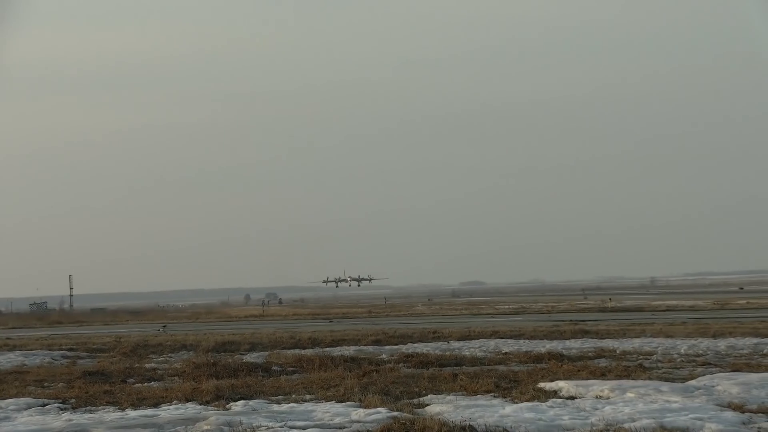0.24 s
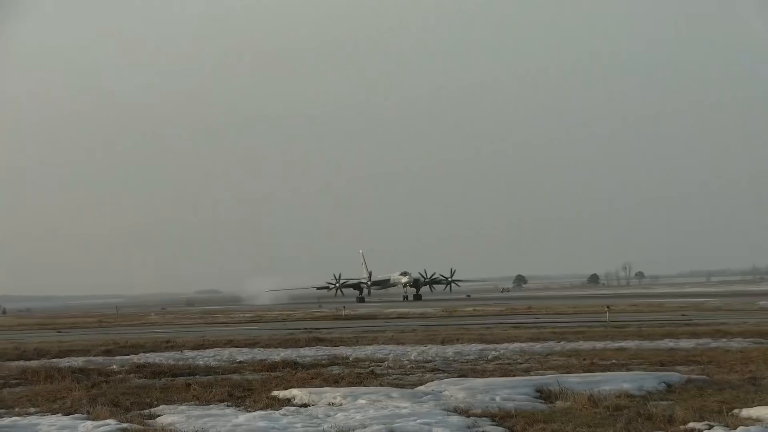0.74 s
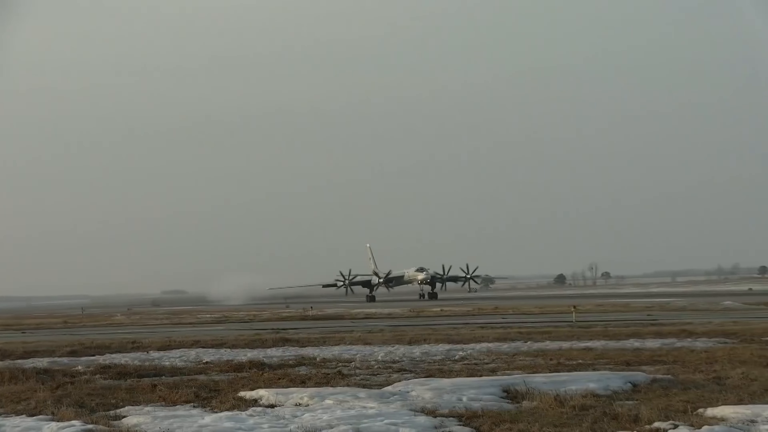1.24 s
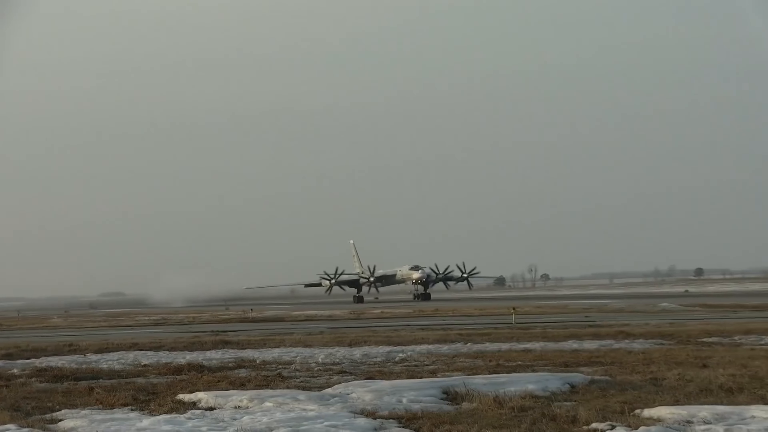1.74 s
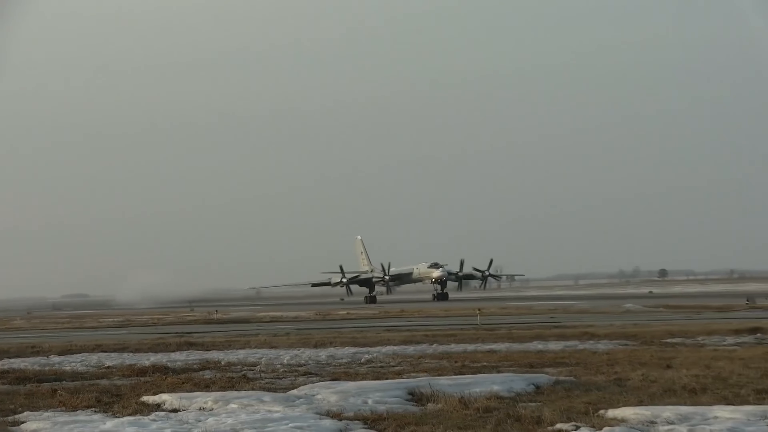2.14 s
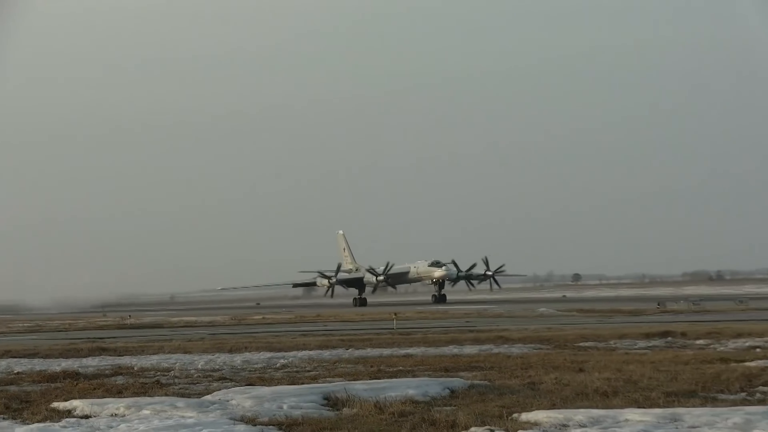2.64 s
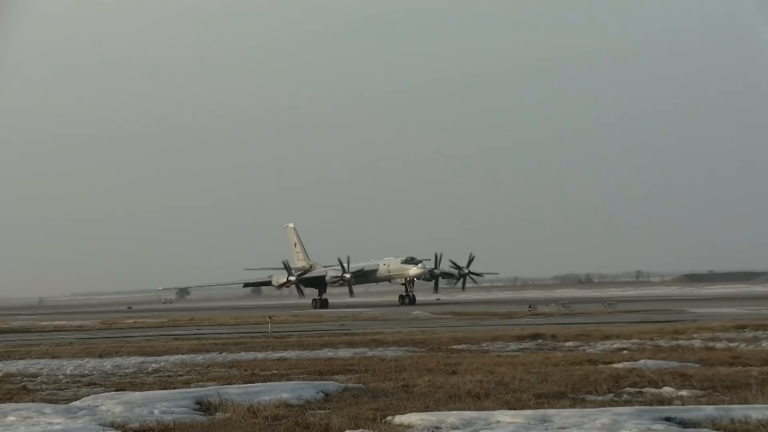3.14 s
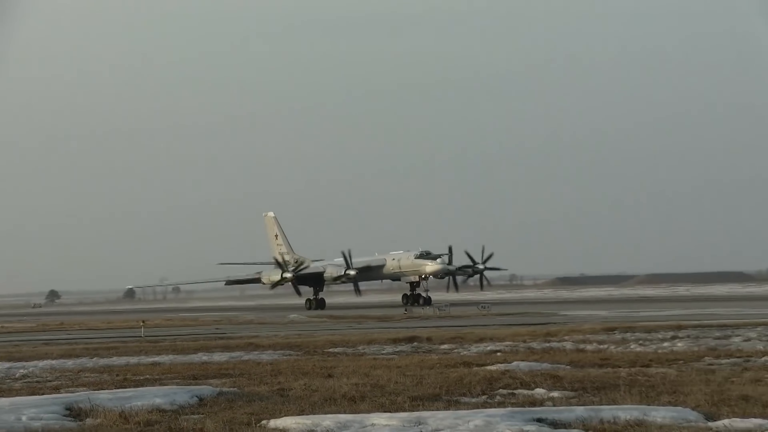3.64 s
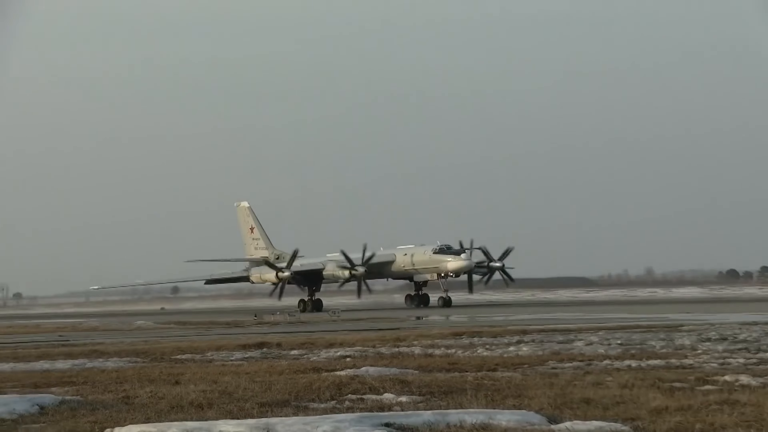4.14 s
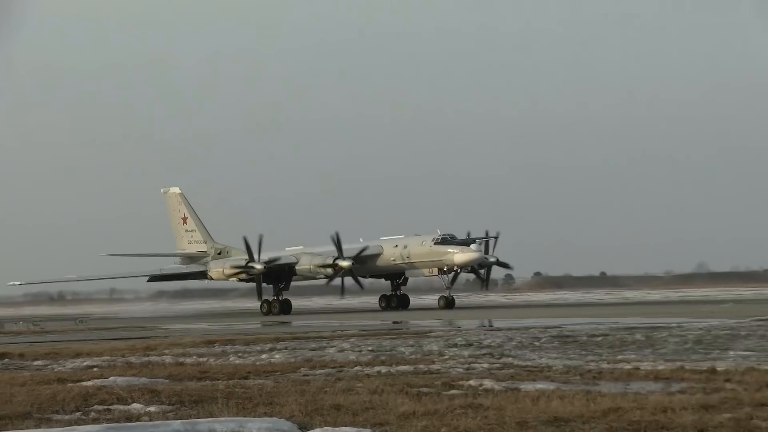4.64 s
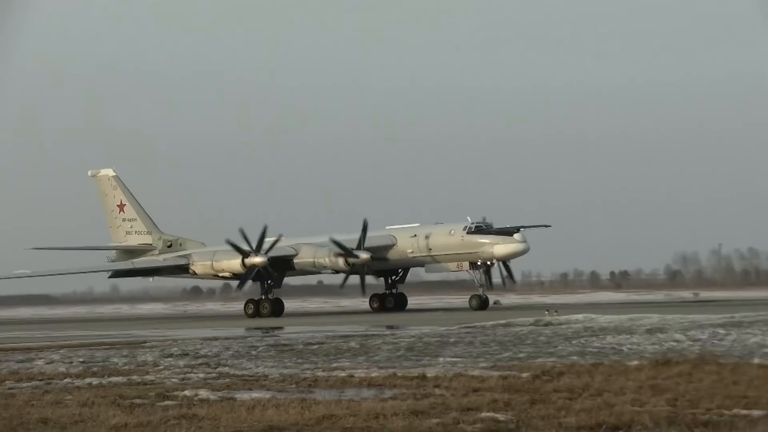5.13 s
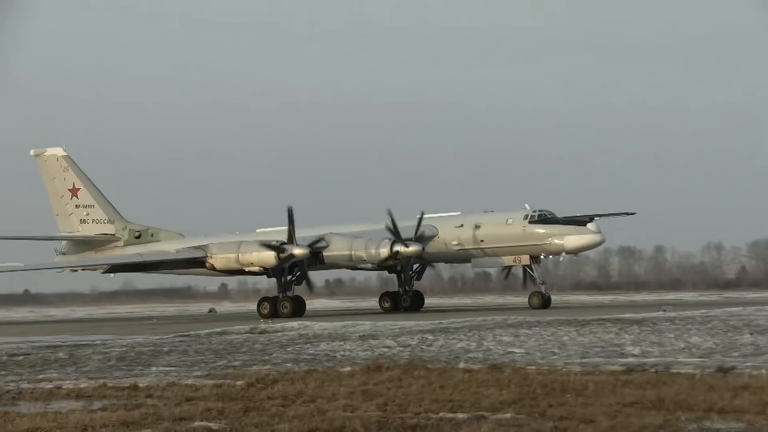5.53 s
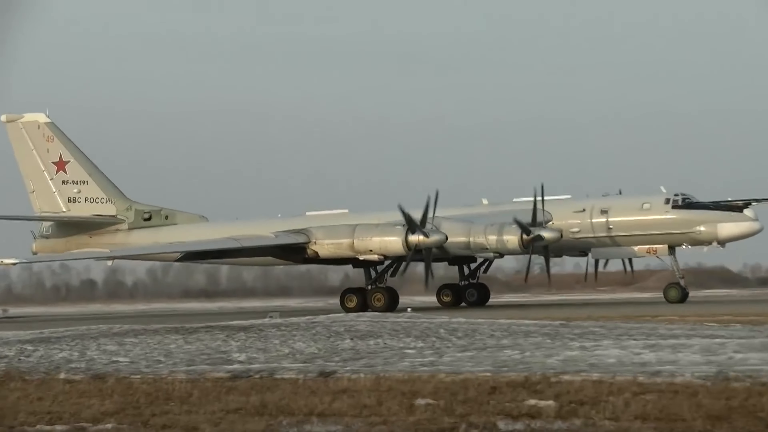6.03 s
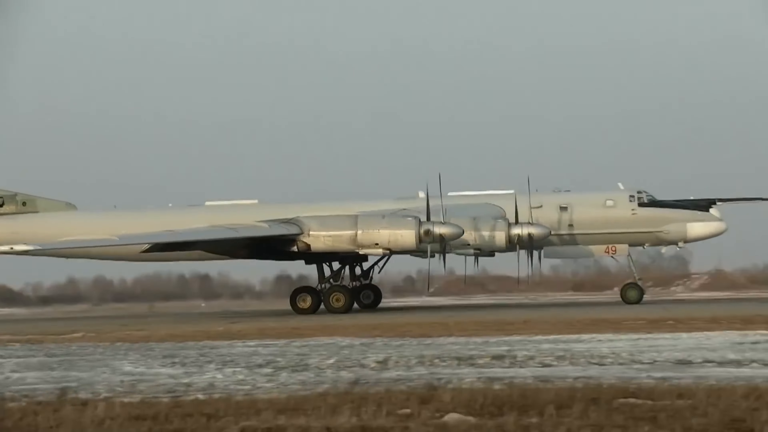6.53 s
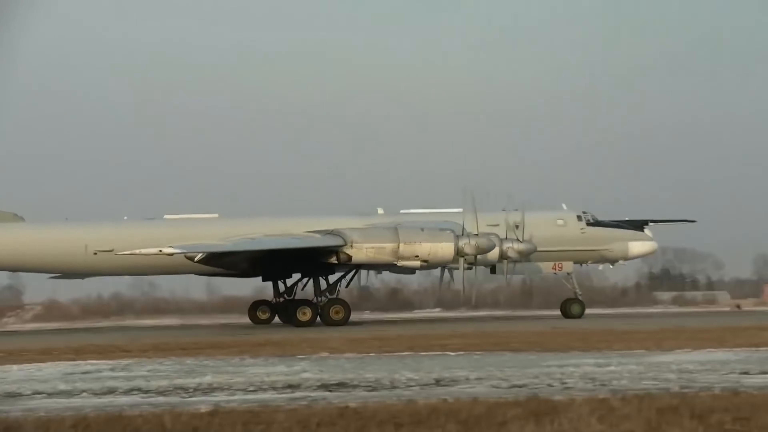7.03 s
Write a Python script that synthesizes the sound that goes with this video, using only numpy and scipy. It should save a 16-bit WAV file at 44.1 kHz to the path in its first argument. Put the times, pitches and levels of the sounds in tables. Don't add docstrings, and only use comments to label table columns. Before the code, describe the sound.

Distant propeller hum jumps nearer, then a heavy aircraft's throbbing drone and rushing roar build, brighten and slide lower while rolling by.

```python
import sys
import numpy as np
from scipy import signal
from scipy.fft import rfft, irfft, next_fast_len
from scipy.io import wavfile
from scipy.ndimage import uniform_filter1d

SR = 44100
rng = np.random.default_rng(int(sys.argv[2]) if len(sys.argv) > 2 else 0)


def transcribe(signal):
    frames = np.atleast_2d(signal).T
    limited = np.clip(frames, -1, 1)
    pcm = np.round(limited * 32767).astype(np.int16)
    wavfile.write(sys.argv[1], SR, pcm)


def rack_gain(trim_db):
    fader = np.asarray(trim_db, float)
    return 10 ** (fader / 20)


N = 321048
CHANGE_S = 0.7235


def in_time(rows, t):
    s, *columns = np.transpose(rows)
    return np.array([np.interp(t, s, column) for column in columns])


def at_hz(points, hz):
    points_hz, points_db = np.transpose(points)
    return np.interp(np.log(hz + 1), np.log(points_hz), points_db)


def drift(rate_hz, count):
    pole = np.exp(-80 * np.pi * rate_hz / SR)
    chance = rng.standard_normal((count, N // 40 + 2002))
    slow = signal.lfilter([1], [1, -2 * pole, pole * pole], chance)[:, 2000:]
    slow = slow / slow.std(axis=1, keepdims=True)
    return np.repeat(slow, 40, axis=1)[:, :N]


def smooth_drift(rate_hz, count):
    return uniform_filter1d(drift(rate_hz, count), size=80)


def abeam(blade_hz):
    head_on_hz, abeam_hz = 63, 44
    return np.clip((head_on_hz - blade_hz) / (head_on_hz - abeam_hz), 0, 1)


# t/s, level/dB rms, order favoured by the bearing, upper orders' level/dB
DRONE = [(0.724, -54.9, 3.31, -59.5), (1.3, -51.5, 3.71, -61), (2.0, -51.6, 3.75, -63.5),
         (2.7, -49.5, 4.21, -58), (3.4, -43, 3.98, -57), (4.0, -42.5, 5.71, -50), (4.4, -36.5, 6.18, -41),
         (4.8, -32, 6.12, -34.5), (5.2, -35.5, 5.96, -37.5), (5.6, -37, 5.71, -44.5),
         (6.0, -38.5, 5.69, -44), (6.4, -43.5, 4.61, -50), (6.8, -48.5, 4.84, -45),
         (7.28, -51.5, 5.16, -63)]
ORDERS_DB = [1.5, 15.5, 2.8, -0.44, -5.5, -4.5, -2, -5]
OPENING_ORDERS_DB = [-82, -64, -91, -63.5, -88, -72.5, -80, -76.5]
# t/s, order, length/s, gain/dB
SWELLS = [(1.39, 5, 0.17, 8.8), (1.48, 4, 0.52, 7.5), (1.55, 6, 0.1702, 8.5), (2.14, 5, 0.25, 13.5),
          (2.31, 4, 0.16, 7.5), (2.85, 4, 0.22, 8.5), (2.99, 5, 0.32, 11), (3.05, 6, 0.15, 8.2),
          (3.2, 2, 0.094, 3), (3.48, 5, 0.14, 9.5), (3.92, 5, 0.21, 7.5), (4.55, 6, 0.16, 7),
          (4.66, 5, 0.5, 14), (5.05, 3, 0.22, 12.5), (5.19, 6, 0.36, 4), (5.4, 4, 0.098, 24),
          (5.41, 5, 0.21, 7), (5.62, 3, 0.28, 11), (6.05, 1, 0.44, 22), (6.07, 3, 0.055, 10),
          (6.33, 3, 0.094, 9.5), (6.5, 2, 0.1, 1.5), (6.5, 7, 0.08, 7), (6.54, 3, 0.045, 10),
          (6.79, 7, 0.18, 3), (6.85, 4, 0.07, 11.6), (6.88, 3, 0.071, 13), (7.0, 8, 0.1, 10),
          (7.03, 2, 0.081, 9), (7.2, 1, 0.31, 19)]
# t/s, order, length/s, gain/dB
NULLS = [(0.745, 4, 0.1, -9.5), (0.9, 3, 0.34, -26), (1.72, 3, 0.36, -24.0), (1.75, 2, 0.27, -12.1),
         (2.445, 5, 0.1, -12), (2.58, 4, 0.056, -17), (2.672, 6, 0.37, -5.6), (3.132, 3, 0.24, -7),
         (3.237, 4, 0.046, -7), (3.69, 7, 0.054, -10.1), (3.78, 6, 0.087, -24.0), (3.93, 3, 0.15, -22),
         (3.98, 4, 0.23, -14), (4.245, 8, 0.18, -12), (4.705, 7, 0.094, -26), (5.121, 7, 0.098, -24),
         (5.17, 8, 0.24, -14), (5.35, 3, 0.065, -8), (5.442, 4, 0.36, -18.5), (5.79, 5, 0.06, -17),
         (5.874, 7, 0.13, -28), (5.95, 3, 0.037, -18), (6.29, 2, 0.11, -24.0), (6.47, 5, 0.049, -17),
         (6.783, 2, 0.051, -4)]
# t/s, order, length/s, gain/dB
LATE_NULL = (6, 2.5, 0.2, -10)


def order_levels(t, blade_hz):
    level_db, favoured, upper_db = in_time(DRONE, t)
    order = np.arange(1, 9)[:, None]
    octaves_off = np.log2(order / np.maximum(favoured, 1))
    db = np.array(ORDERS_DB)[:, None] + level_db - 10.5 * octaves_off ** 2
    db[0] = -71
    for s, k, length_s, beat_db in [*SWELLS, *NULLS, LATE_NULL]:
        db[round(k) - 1] += beat_db * np.exp(-((t - s) / length_s) ** 2)
    db = np.where(t < CHANGE_S, np.array(OPENING_ORDERS_DB)[:, None], db)
    head_on_beat_db, abeam_beat_db = 0.5, 4.5
    beat_depth_db = head_on_beat_db + (abeam_beat_db - head_on_beat_db) * abeam(blade_hz)
    db += beat_depth_db * np.minimum(smooth_drift(3.89, count=8), 1)
    opening_upper_db = -72
    return db, np.where(t < CHANGE_S, opening_upper_db, upper_db + 4)


def low_orders(orders_db, turn, shake, apart):
    flutter_db, wander_rad = 1.24, 0.95
    tones = np.zeros(N)
    for k, db in enumerate(orders_db):
        phase = (k + 1) * turn + wander_rad * apart[k] + np.pi - 2.7 / (k + 1)
        tones += np.sqrt(2) * rack_gain(db + flutter_db * shake[k]) * np.cos(phase)
    return tones


# multiple of the blade rate, level/dB
UPPER = [(9, -14), (10, -8.5), (11, -7), (12, -6.5), (13, -6), (14, -10), (15, -12), (16, -11), (18, -24),
         (19, -45), (20, -23), (21, -36), (23, -24)]


def upper_orders(upper_db, turn, blade_hz):
    near_engine, far_engines, detune = 1.55, 0.55, 0.00197
    slip = detune * np.cumsum(drift(0.5936, count=3) * blade_hz, axis=1) * 2 * np.pi / SR
    start = rng.uniform(0, 2 * np.pi, (len(UPPER), 3, 1))
    tones = np.zeros(N)
    for (order, db), start_rad in zip(UPPER, start):
        engines = np.sin(round(order) * (turn + slip) + start_rad)
        tones += rack_gain(upper_db + db - 4.0) * np.dot([near_engine, far_engines, far_engines], engines)
    return tones


def blade_row_tone(engine_db, blade_hz, turn, shake, apart):
    order, base_db, fade_db, flutter_db = 2.47, -5, 42, 5.0
    db = engine_db + base_db - fade_db * abeam(blade_hz) + flutter_db * np.minimum(shake, 1)
    return rack_gain(db) * np.sin(order * turn + 2 * apart)


# t/s, Doppler-shifted blade rate f/Hz, air path/m, engine level/dB after gain control
PASS = [(0.0, 64.26, 780, -66.5), (0.72, 65.3, 580, -64.5), (0.724, 63.23, 840, -55),
        (1.13, 63.1, 760, -53), (1.8, 63.1, 623, -50), (2.46, 62.56, 413, -47), (3.04, 62.27, 295, -44.5),
        (3.55, 61.58, 240, -42), (3.88, 61.15, 220, -38.5), (4.21, 60.26, 160, -36),
        (4.65, 58.72, 107, -34), (5.07, 57.15, 135, -29.5), (5.45, 56.3, 104.0, -28.5),
        (5.8, 54.32, 86, -26.5), (6.17, 52.53, 110, -26.5), (6.5, 49.87, 93.5, -26.5),
        (6.85, 46.68, 86, -27.5), (7.28, 44.3, 95, -27)]


def propellers():
    t = np.arange(N) / SR
    blade_hz, _, engine_db = in_time(PASS, t)
    orders_db, upper_db = order_levels(t, blade_hz)
    turn = 2 * np.pi * np.cumsum(blade_hz) / SR
    shake = smooth_drift(29.0, count=8)
    apart = smooth_drift(0.5, count=8) * np.linspace(0.5, 2, N)
    tones = low_orders(orders_db, turn, shake, apart) + upper_orders(upper_db, turn, blade_hz)
    return tones + blade_row_tone(engine_db, blade_hz, turn, shake[0], apart[0]), turn


# level/dB, air loss/(dB per km), gain abeam/dB
NOISE = [
    (3.26, -7.4, -22.5),
    (-11, -3.5, -0.5),
    (1.38, 0.2, -1.64),
    (-6, 13.5, -0.5),
    (-10, 59, 15.4),
    (-21, 114, 15.5),
]


def band_levels(t):
    blade_hz, path_m, level_db = in_time(PASS, t)
    base_db, loss_db_per_km, beam_db = np.transpose(NOISE)[:, :, None]
    levels = level_db + base_db - loss_db_per_km * path_m / 1000 + beam_db * abeam(blade_hz)
    wash_peak_db = np.array([[1.5], [6]])
    levels[:2] += wash_peak_db * np.exp(-((t - 4.93) / 0.47) ** 2)
    levels[3:] += 3.5 * np.exp(-((t - 5.3) / 0.16) ** 2)
    shimmer_db = 0.28
    levels[3:] += shimmer_db * drift(5.0, count=3)[:, np.minimum(t * SR, N - 1).astype(int)]
    return levels


def bump(rows, below_hz, above_hz, hz, t):
    centre_hz, db = in_time(rows, t)
    away = hz[:, None] - centre_hz
    width_hz = np.where(away < 0, below_hz, above_hz)
    return db * (t > CHANGE_S) * np.exp(-(away / width_hz) ** 2)


# f/Hz, width/Hz, left level/dB, right level/dB
PORTS = [(930, 250, -4.4, -5.7), (1850, 950, 7, 2.4), (2240, 300, -6.5, -7.5), (2530, 420, 6, 6.5),
         (3380, 350, 3, .8), (4450, 420, 1, -7), (4750, 420, -5, -4.5), (5650, 600, -2.5, 1),
         (6230, 390, 5.3, 5), (6870, 550, -7.9, -1.7), (7100, 320, .2, -7), (7390, 420, -7.5, 7.5),
         (7840, 270, 6, -9.2), (8260, 150, 2, 2.3), (8800, 300, -3.5, 1), (11000, 700, -7, 3)]


def port(side):
    sections = []
    for hz, width_hz, *db in PORTS:
        a = rack_gain(db[side] / 2)
        q = np.tan(np.pi * width_hz / SR)
        c = -2 * np.cos(2 * np.pi * hz / SR)
        section = np.array([1 + q * a, c, 1 - q * a, 1 + q / a, c, 1 - q / a])
        sections.append(section / (1 + q / a))
    return np.array(sections)


# low f/Hz, high f/Hz
BANDS_HZ = [
    (90, 450),
    (500, 1000),
    (1200, 2900),
    (3200, 3900),
    (5700, 6700),
    (7800, 10000),
]
# f/Hz, level/(dB per Hz)
COLOUR = [(40, -24), (90, -8), (200, 1), (450, 4.5), (900, 9.5), (1500, -1.5), (3600, -2.5), (4100, -7),
          (5300, -3), (6600, -6.5), (7100, -20), (10200, -36), (10800, -47), (16000, -55)]
# f/Hz, level/dB
OPENING_COLOUR = [(400, -2.5), (600, 6), (900, 4.5), (1150, 4), (1420, -9), (1750, -2.5), (2250, 6.5), (2600, -6),
                  (3300, 4.5), (3800, -1)]
# t/s, centre f/Hz, level above the roar/dB
WHINE = [(0.72, 4550, 16), (2.5, 4517, 12.5), (4.0, 4516, 12), (4.45, 4268, 6.5), (4.54, 4317, 14.5),
         (4.62, 4100, 7.5), (5.2, 4199, 6.5), (6.3, 3560, 1.5), (7.28, 3498, 2)]
# t/s, centre f/Hz, level/dB
LOW_NULL = [(0.72, 1140, 0), (3.3, 1100, -0.5), (3.8, 1220, -5.5), (4.5, 1180, -5.5), (5.3, 1070, -4.5),
            (6.2, 927.5, -6), (7.28, 750, -8.5)]
# t/s, centre f/Hz, level/dB
RIDGE = [(5.3, 2300, 0.1), (5.7, 2250, 2.9), (6.1, 2040, 3.7), (6.5, 1819, 2.37), (7.28, 1600, 1.9)]
# t/s, centre f/Hz, level/dB
LOW_BAND = [(0.72, 480, -3), (3.8, 584, -5.5), (4.5, 600, -.5), (5.6, 480, .5), (6.6, 460, 3.5),
            (7.28, 440, 2)]
# t/s, centre f/Hz, level/dB
GROUND = [(0.72, 3100, -7), (2.2, 3100, -8), (3.5, 2970, -8), (4.35, 2850, -7), (4.5, 2850, -1.5),
          (4.55, 3420, -1.5), (4.7, 3330, -8), (5.1, 3130, -10), (5.5, 3010, -9), (6.3, 3060, -6),
          (7.28, 3040, -10)]


def air_noise():
    hz, t, cells = signal.stft(rng.standard_normal(N), SR, nperseg=512)
    ports = sum(signal.sosfreqz(port(side), hz, fs=SR)[1] for side in range(2)) / 2
    heard = np.abs(ports) * rack_gain(at_hz(COLOUR, hz))
    have = [np.sqrt(np.sum(heard[(hz > low) & (hz < high)] ** 2) / len(hz)) for low, high in BANDS_HZ]
    need_db = band_levels(t) - 20 * np.log10(have)[:, None]
    centres = np.log([np.sqrt(low * high) for low, high in BANDS_HZ])
    blend = np.array([np.interp(np.log(hz + 1), centres, row) for row in np.eye(len(centres))])
    eddies = uniform_filter1d(rng.standard_normal(cells.shape), size=9)
    eddies = uniform_filter1d(eddies, size=7, axis=0)
    eddies = eddies / eddies.std()
    patchy_db = 0.62
    gain_db = blend.T @ need_db + at_hz(COLOUR, hz)[:, None] + patchy_db * eddies
    gain_db += bump(WHINE, 280, 590, hz, t) * (1 + 0.082 * eddies[len(hz) // 5])
    gain_db += bump(LOW_NULL, 190, 200, hz, t)
    gain_db += bump(RIDGE, 110, 150, hz, t)
    gain_db += bump(LOW_BAND, 110, 110, hz, t)
    gain_db += bump(GROUND, 130, 130, hz, t)
    gain_db += np.outer(at_hz(OPENING_COLOUR, hz), t < CHANGE_S)
    return signal.istft(cells * rack_gain(gain_db), SR, nperseg=512)[1][:N]


# f/Hz, level/dB rms
HUM = [(750.5, -63.5), (1126, -79), (1502, -83), (1877, -82)]


def faint_hum(t):
    hum = np.zeros(N)
    for (hz, db), waver in zip(HUM, smooth_drift(7.0, count=len(HUM))):
        hum += np.sqrt(2) * rack_gain(db + 0.0012 * hz * waver) * np.sin(2 * np.pi * hz * t)
    return hum * rack_gain(-4 * (t > CHANGE_S))


# f/Hz, level/(dB per Hz)
HISS = [(2650, -2), (4500, 0.5), (4850, -2), (5330, 0), (7690, -3.5), (13900, -10.5), (16000, -16)]


def microphone_hiss(hz, size):
    spectrum = rfft(rng.standard_normal((2, size))) * rack_gain(at_hz(HISS, hz))
    hiss = irfft(spectrum, size)[:, :N]
    return rack_gain(-70) * hiss / hiss.std()


# f/Hz, level/(dB per Hz)
FIZZ = [(8200, -24.5), (9000, -10), (10000, -11), (10500, -8), (11800, -8), (12500, -9), (15000, -12)]


def blotchy_fizz(dry):
    bright = signal.sosfilt(signal.butter(2, 3500, "high", fs=SR, output="sos"), dry)
    loud = np.sqrt(uniform_filter1d(bright ** 2, size=2000) + 1e-12)
    hz, t, cells = signal.stft(rng.standard_normal((2, N)), SR, nperseg=1024)
    spots = rng.standard_normal((2, len(hz) // 4 + 1, len(t) // 4 + 1))
    spots = spots.repeat(4, axis=1).repeat(4, axis=2)[:, :len(hz), :len(t)]
    blotch_db = 10.0
    gain_db = at_hz(FIZZ, hz)[:, None] + blotch_db * np.minimum(spots, 1)
    return loud * rack_gain(-26) * signal.istft(cells * rack_gain(gain_db), SR, nperseg=1024)[1][:, :N]


def scene():
    t = np.arange(N) / SR
    tones, turn = propellers()
    chop = 1 + 0.046 * np.sin(turn) + 0.1 * np.sin(2 * turn)
    mono = tones + chop * air_noise() + faint_hum(t)
    return np.array([mono, mono])


def roll_off(x):
    return signal.sosfilt(signal.butter(12, 16380, fs=SR, output="sos"), x)


BASS_CUT_HZ = [42, 19.4]


def record(dry):
    dry = signal.sosfilt(signal.butter(3, 65, "high", fs=SR, output="sos"), dry[0])
    heard = []
    for side, cut_hz in enumerate(BASS_CUT_HZ):
        coloured = signal.sosfilt(port(side), dry)
        heard.append(signal.lfilter(*signal.butter(1, cut_hz, "high", fs=SR), coloured))
    tilt_db = 0.6 * np.array([[1], [-1]])
    size = next_fast_len(N + 4096)
    hz = np.arange(size // 2 + 1) * SR / size
    mixed = np.array(heard) * rack_gain(tilt_db) + microphone_hiss(hz, size) + blotchy_fizz(dry)
    to_nearest_end = np.minimum(np.arange(N), np.arange(N, 0, -1))
    mixed = mixed * np.minimum(to_nearest_end / 200, 1)
    lag_s = 8e-6 * np.array([[0], [1]])
    lag = np.exp(-2j * np.pi * hz * lag_s)
    top_shelf = rack_gain(-11.0 * (hz > 15750))
    mixed = irfft(rfft(mixed, size) * lag * top_shelf, size)[:, :N]
    return roll_off(mixed)


dry = scene()
out = record(dry)
transcribe(out)
```